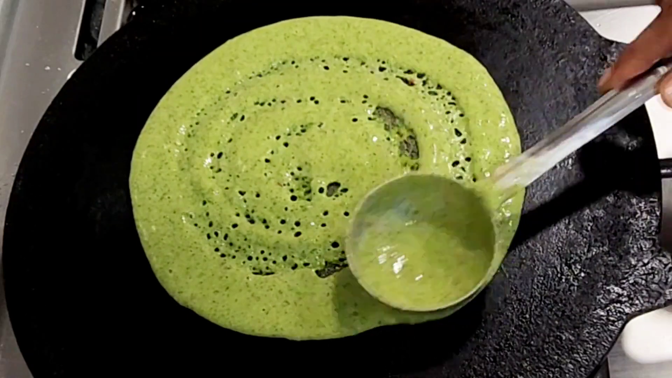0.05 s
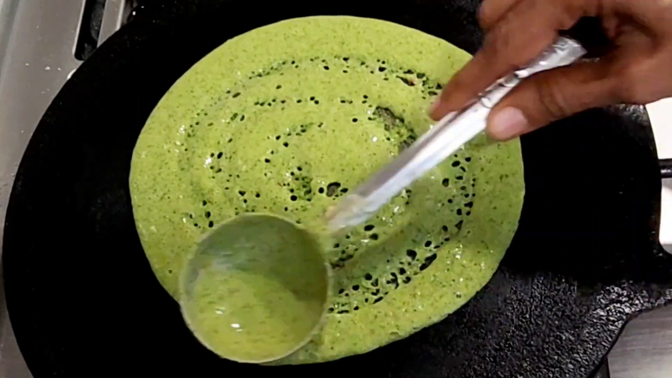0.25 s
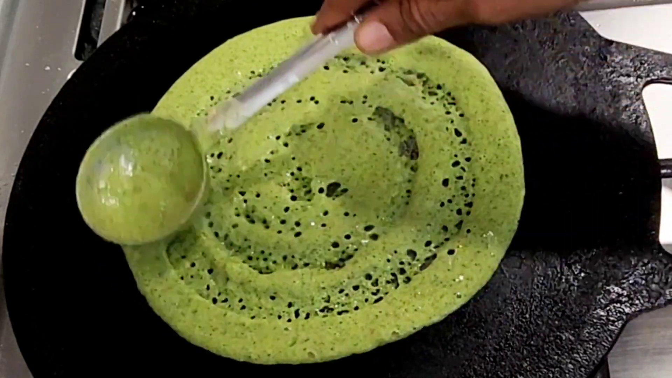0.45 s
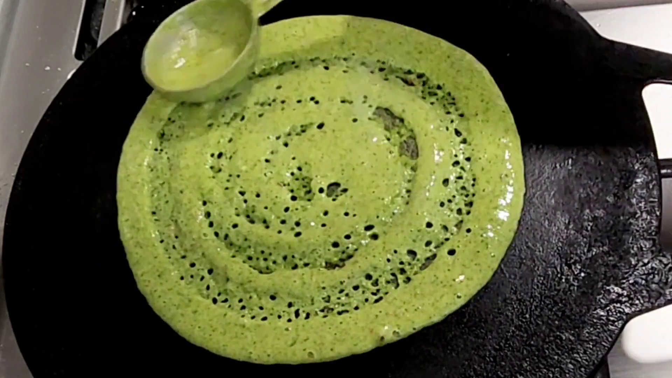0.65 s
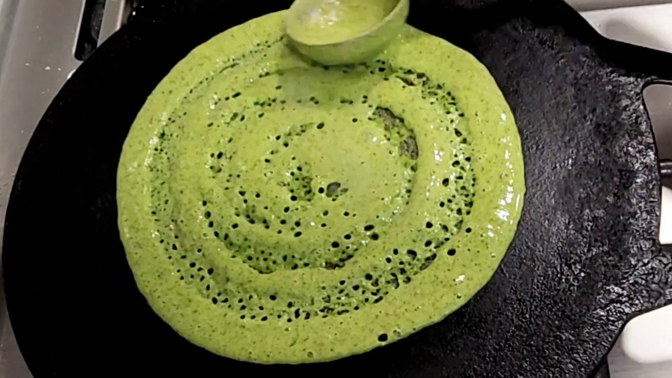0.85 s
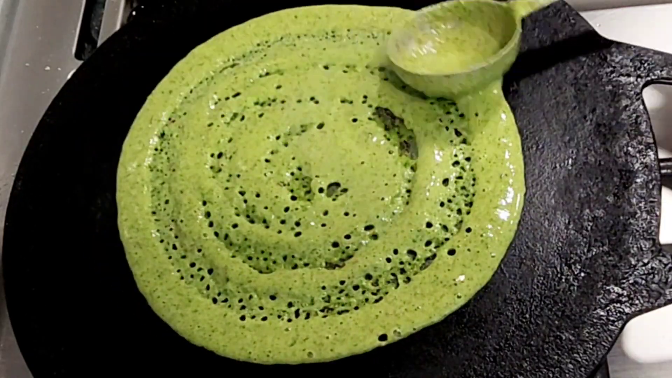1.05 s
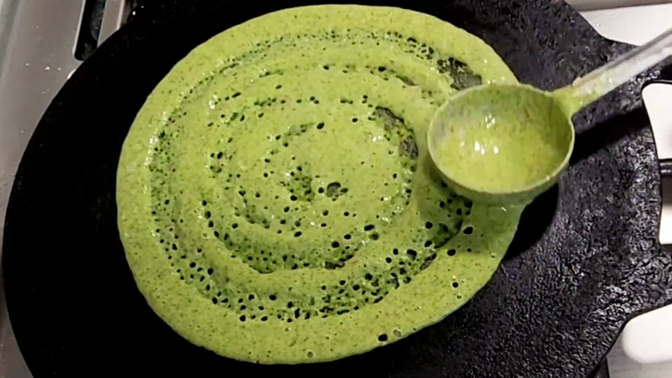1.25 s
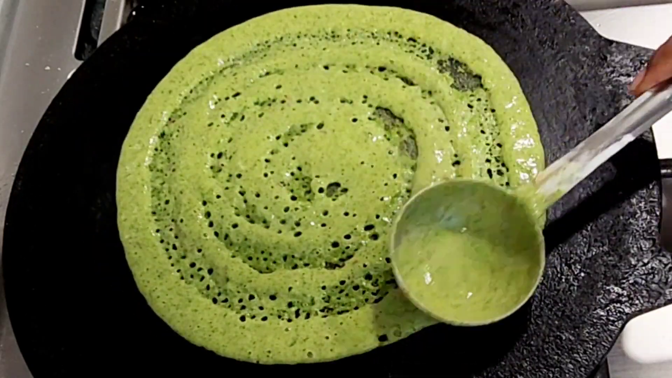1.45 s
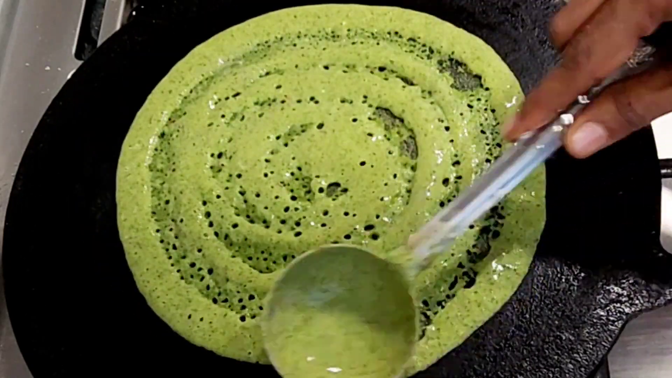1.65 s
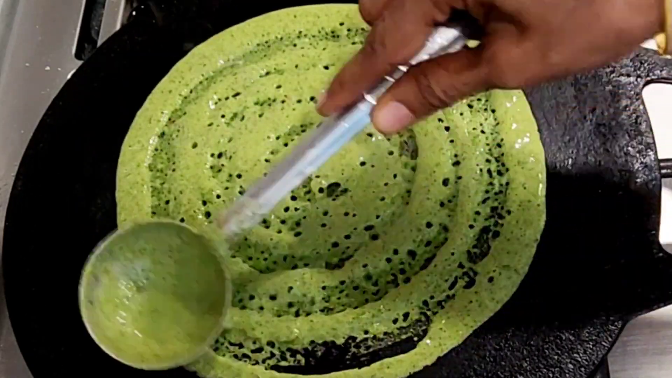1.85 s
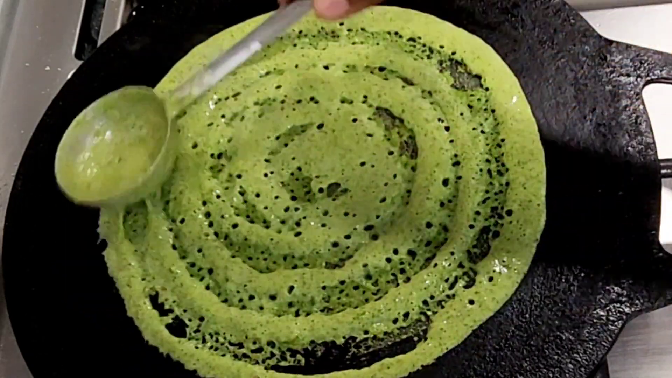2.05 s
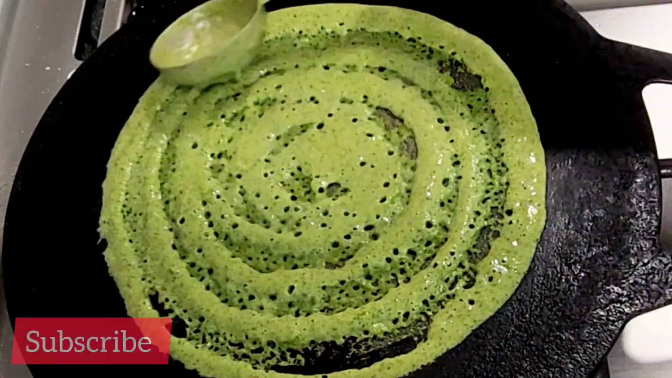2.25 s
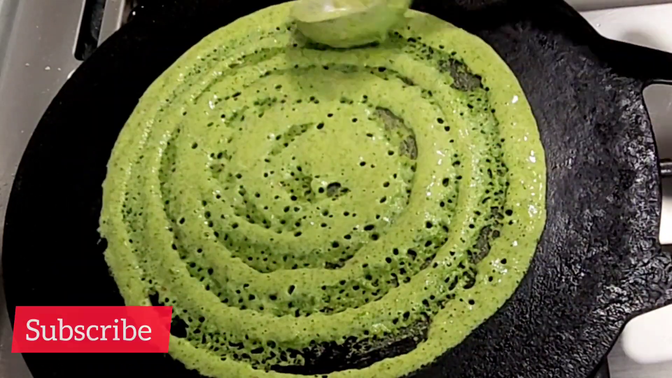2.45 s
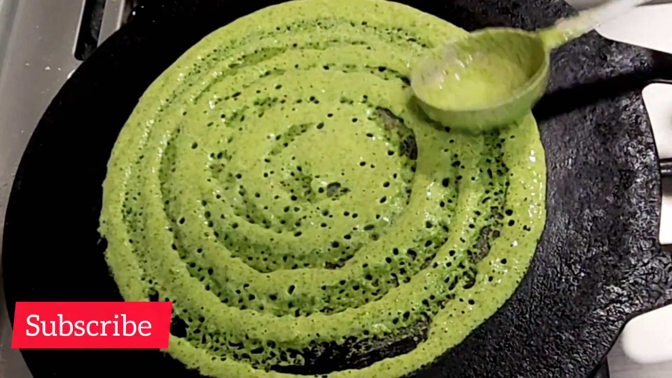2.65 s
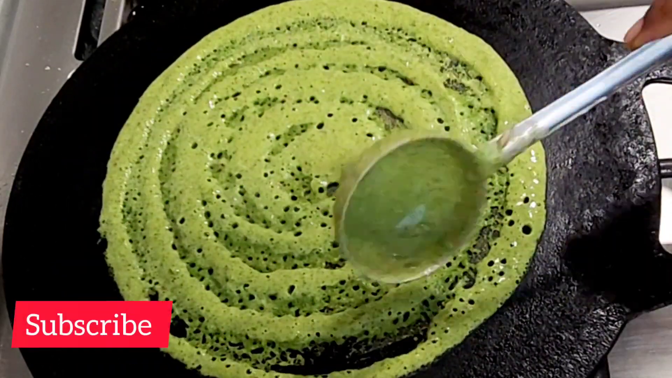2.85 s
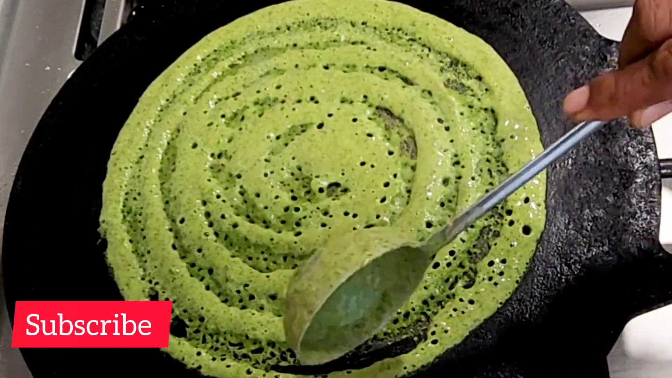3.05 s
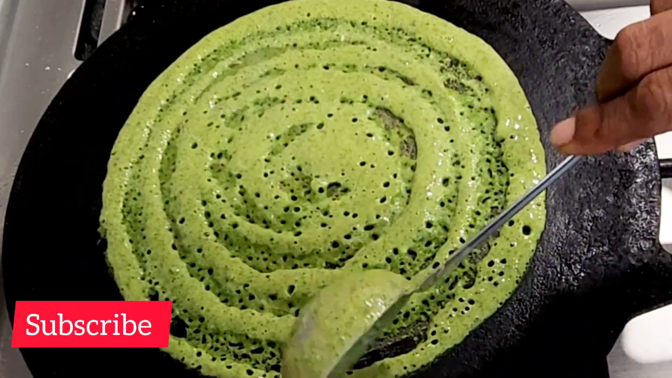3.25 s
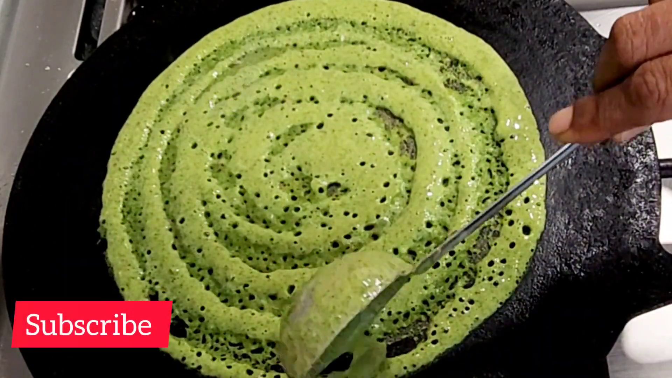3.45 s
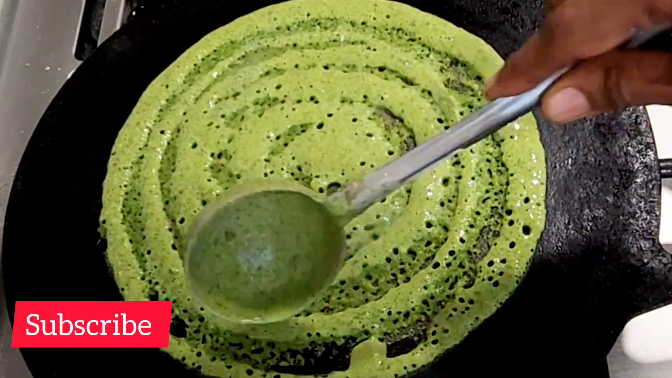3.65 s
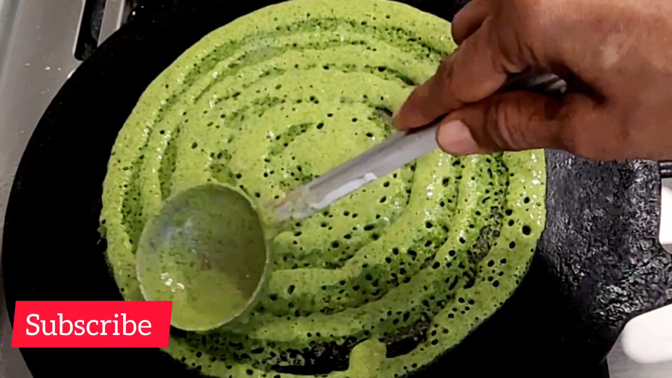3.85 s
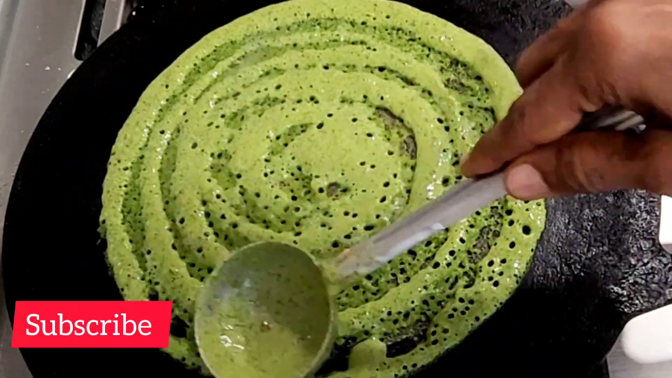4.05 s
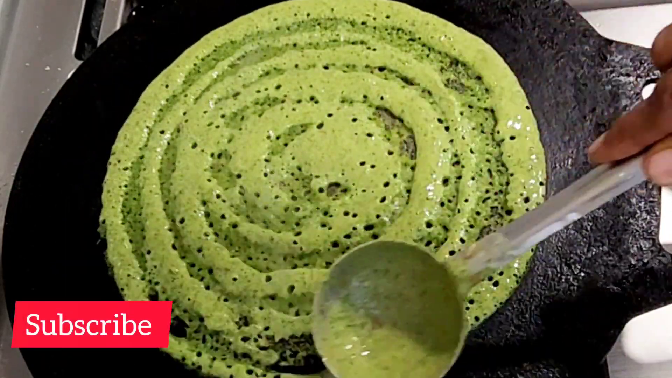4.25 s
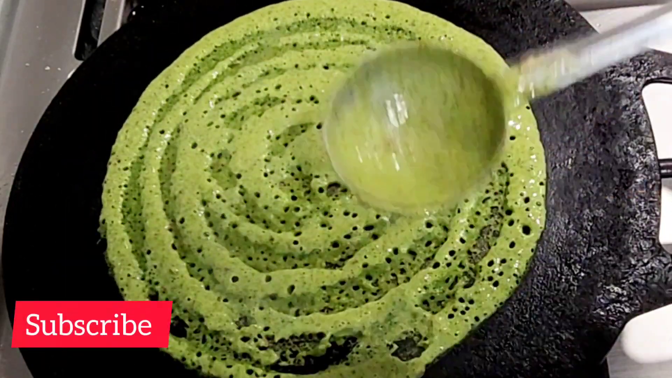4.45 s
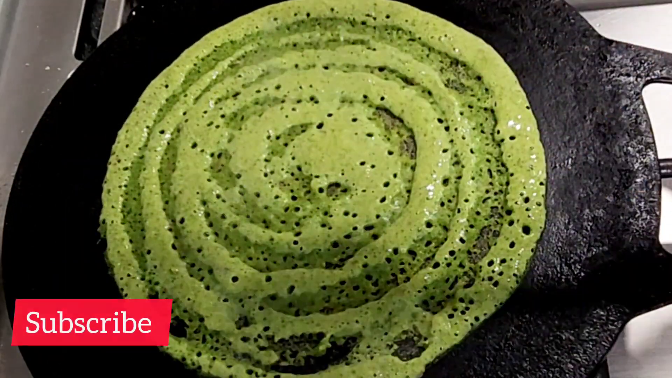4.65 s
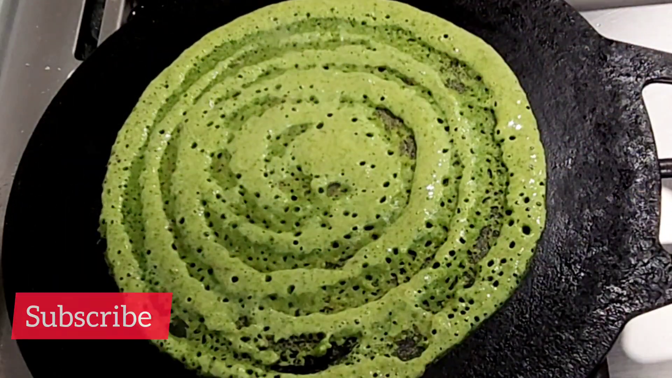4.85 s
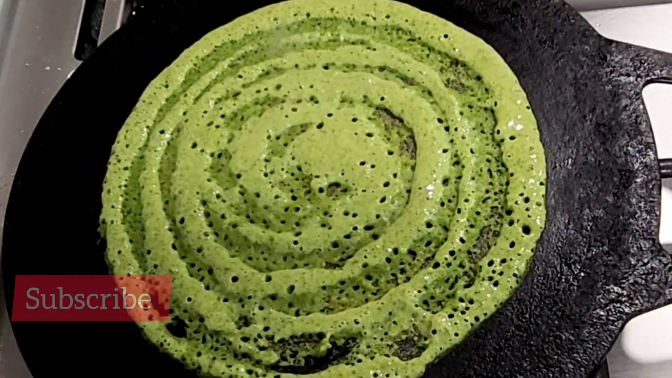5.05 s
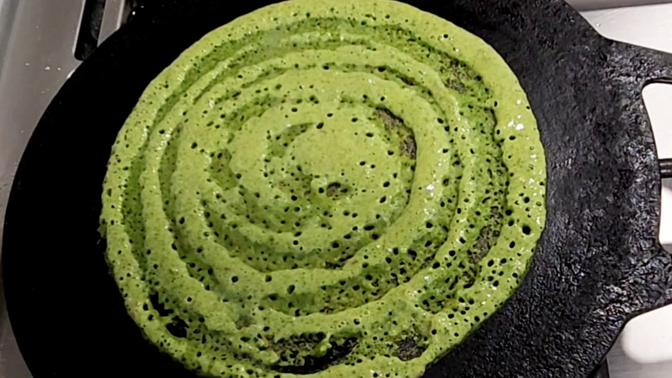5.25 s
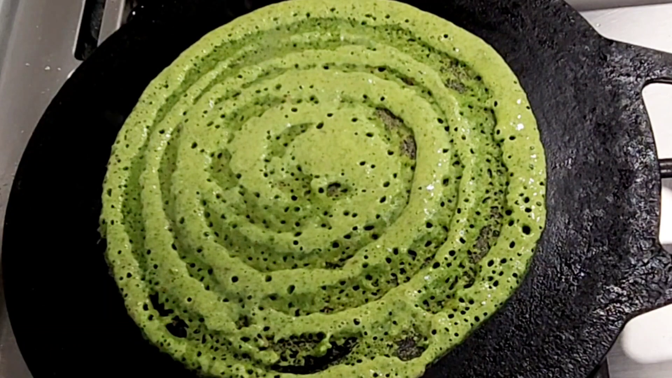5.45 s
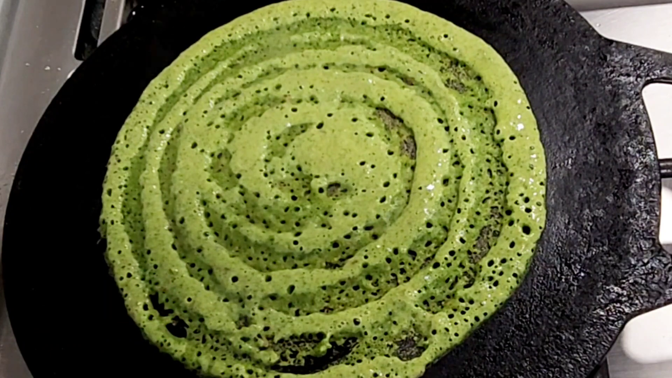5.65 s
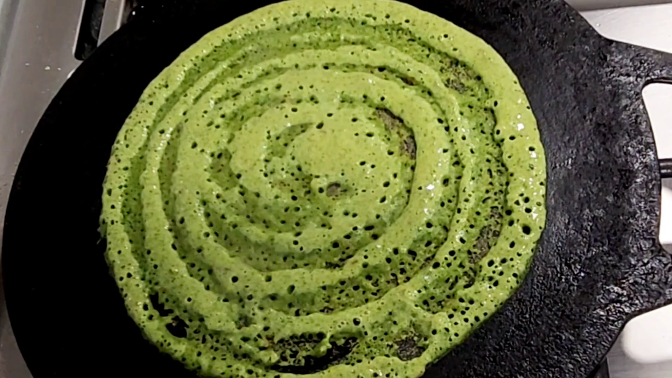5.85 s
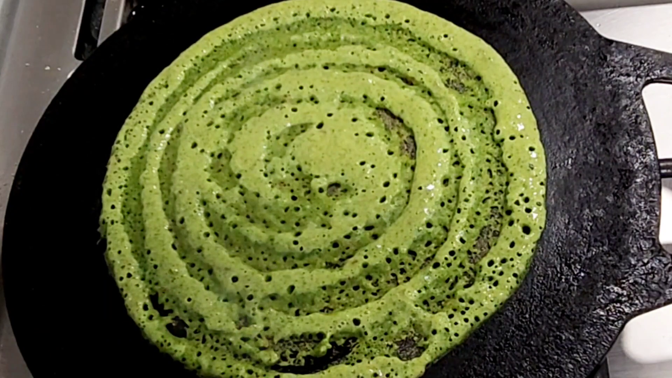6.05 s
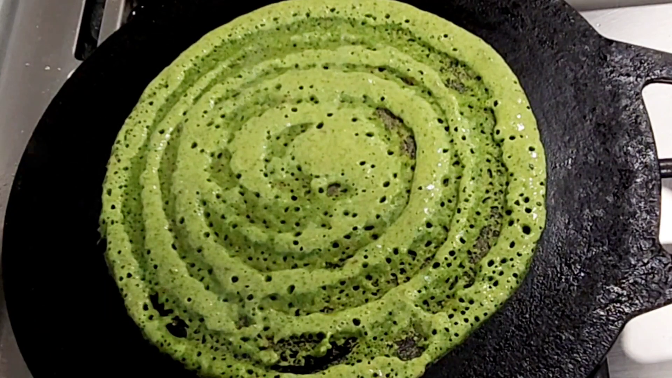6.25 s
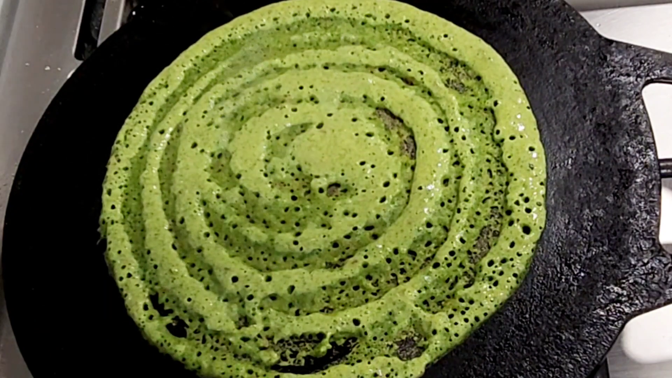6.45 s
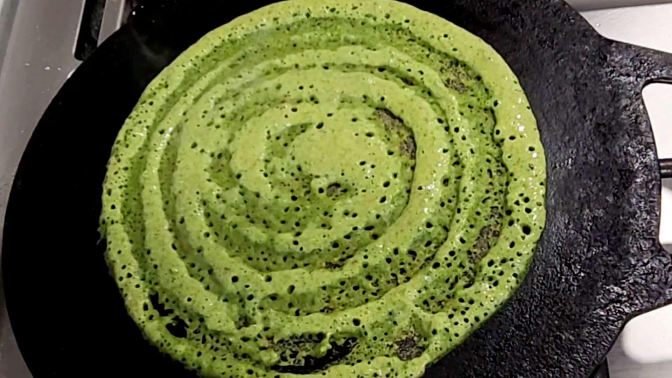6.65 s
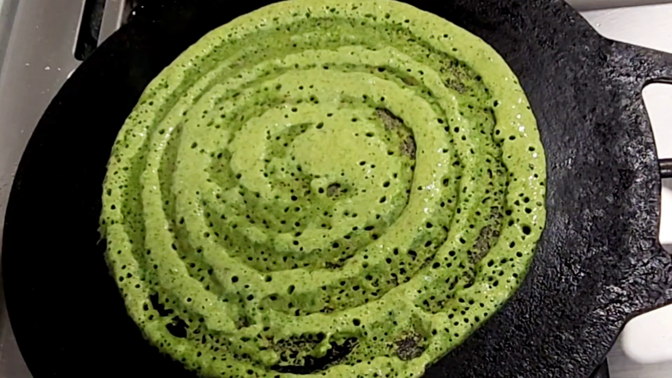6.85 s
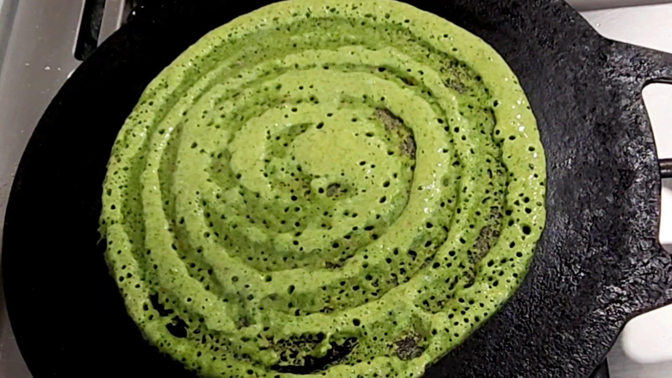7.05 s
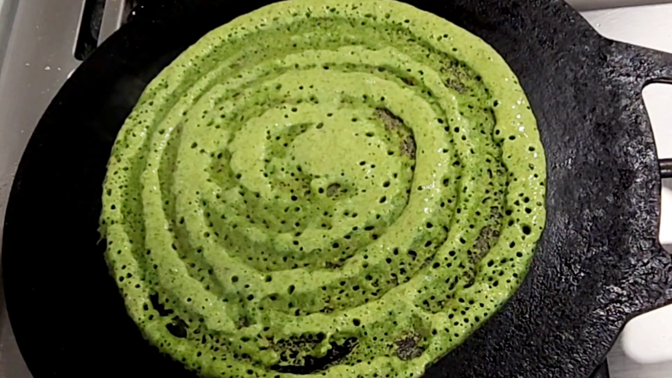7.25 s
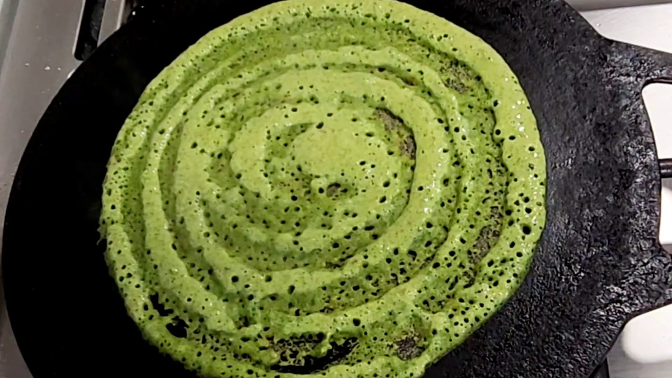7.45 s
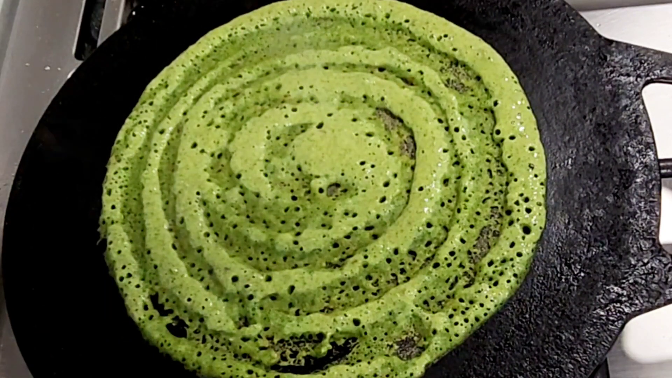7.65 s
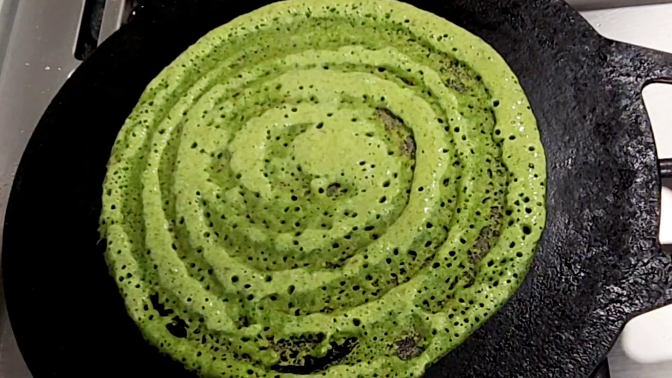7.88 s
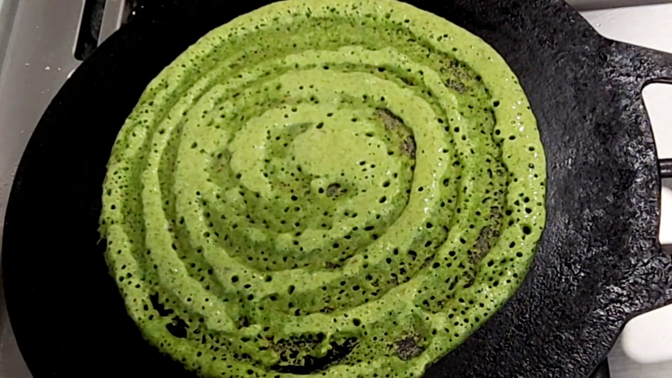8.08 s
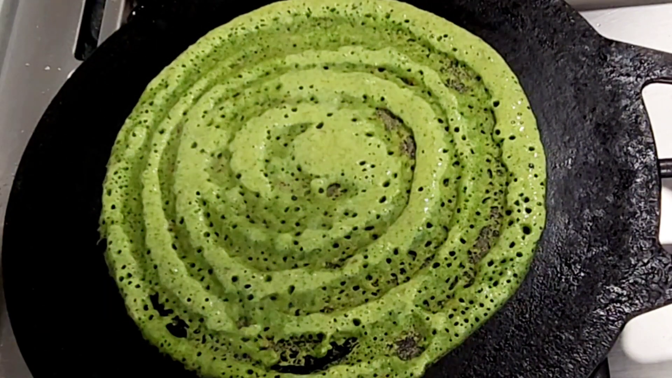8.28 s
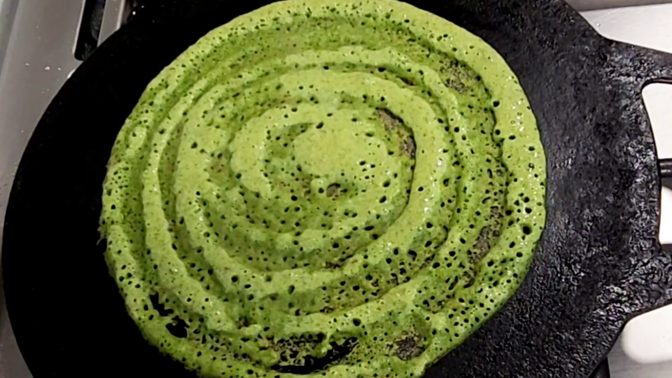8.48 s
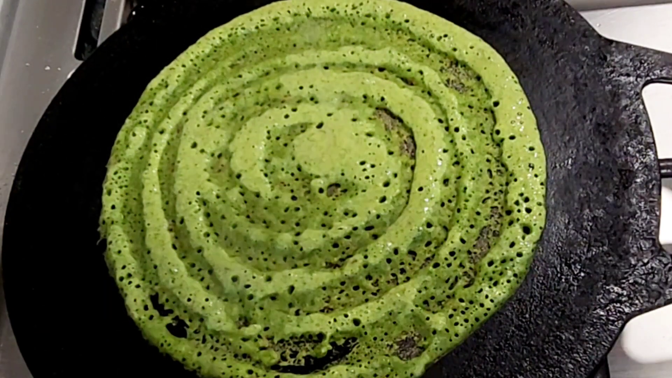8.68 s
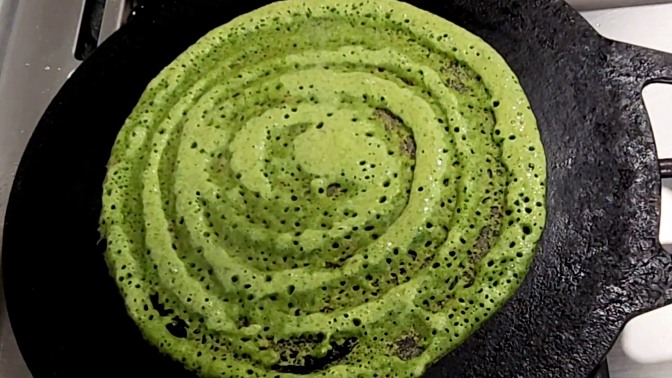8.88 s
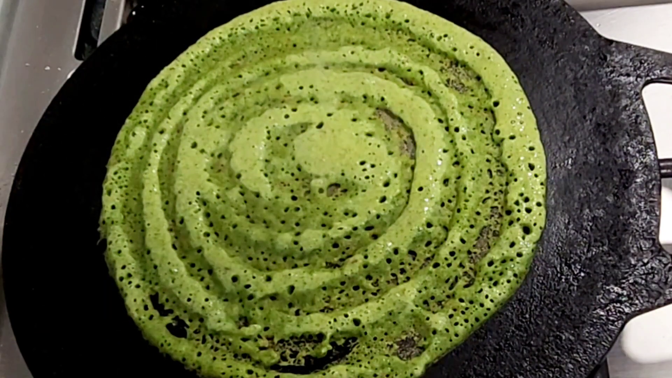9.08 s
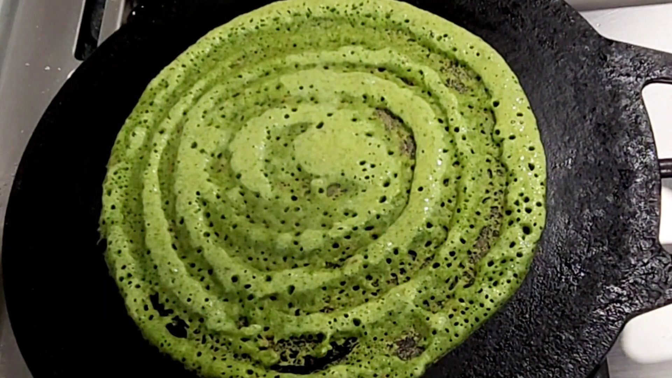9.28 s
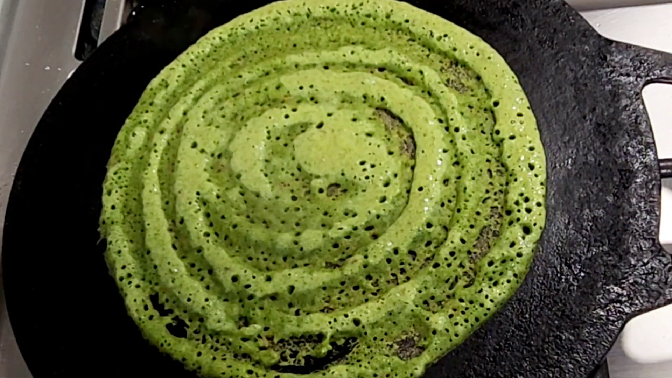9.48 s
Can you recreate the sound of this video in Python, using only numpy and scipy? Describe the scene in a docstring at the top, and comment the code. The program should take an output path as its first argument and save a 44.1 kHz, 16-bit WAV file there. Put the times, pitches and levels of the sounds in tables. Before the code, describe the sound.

Loud wet batter sizzle on hot iron swells twice and dries to sparse spitting, with a ladle knock, a metallic clink and low flame roar.

```python
"""Wet batter is spread with a steel ladle on a hot iron griddle: random bubble bursts make its sizzle.
Two sweeps swell the sizzle; it fades to flurries, and single bubbles spit as a snap and a sputter.
A gas flame roars low, as filtered noise and narrow resonances, in a small kitchen with short reverberation.
Contact forces ring vibration modes: the ladle knocks on the griddle, is put down with a clink and slides.
Two soft bumps follow as muffled noise thuds."""
import sys
import numpy as np
from scipy import signal
from scipy.fft import rfft, irfft
from scipy.io import wavfile
from scipy.ndimage import uniform_filter1d

SR = 44100
rng = np.random.default_rng(int(sys.argv[2]) if len(sys.argv) > 2 else 0)


def unload_audio(sound):
    """Save the sound as a 16-bit wav file, at the path given as the first command line argument."""
    columns = np.transpose(np.atleast_2d(sound))
    # keep every value between -1 and 1, then stretch to whole-number steps
    steps = np.round(np.clip(columns, -1, 1) * 32767)
    wavfile.write(sys.argv[1], SR, steps.astype(np.int16))


N = 419832


def from_db(db):
    """Decibels to amplitude gain."""
    return 10 ** (np.asarray(db) / 20)


def rms_one(x):
    """Scale to rms 1."""
    return x / np.sqrt(np.mean(x ** 2) + 1e-20)


def at_hz(points, hz):
    """Interpolate a table on a log-frequency axis."""
    table_hz, value = np.transpose(points)
    return np.interp(np.log(np.maximum(hz, 1)), np.log(table_hz), value)


def drift(rate_hz, step=40):
    """Slow random signal, rms 1: twice low-passed noise, one value per step samples."""
    pole = np.exp(-2 * np.pi * rate_hz * step / SR)
    noise = rng.standard_normal(N // step + 2002)
    slow = signal.lfilter([1], [1, -2 * pole, pole * pole], noise)[2000:]  # drop the run-in
    return np.interp(np.arange(N) / step, np.arange(len(slow)), rms_one(slow))


def through(x, response):
    """Convolve with a mono or stereo impulse response."""
    return signal.oaconvolve(np.atleast_2d(x), np.atleast_2d(response), axes=-1)[:, :N]


def colour(x, spectrum, size=8192):
    """Minimum-phase filter with the given spectrum, by folding its cepstrum."""
    gain = from_db(at_hz(spectrum, np.fft.rfftfreq(size, 1 / SR)))
    cepstrum = irfft(np.log(gain))
    cepstrum[1:size // 2] *= 2
    cepstrum[size // 2 + 1:] = 0
    return through(x, irfft(np.exp(rfft(cepstrum))))


def ring(force, hz, t60_s):
    """Two-pole resonator: a unit click starts a decaying sine of height 1."""
    pole = np.exp(-np.log(1000) / (t60_s * SR))
    angle = 2 * np.pi * min(hz, SR / 2 - 1) / SR
    feedback = [1, -2 * pole * np.cos(angle), pole * pole]
    return signal.lfilter([0, np.sin(angle)], feedback, force + 1e-18)


def puff(t60_s, size=2048):
    """Dying noise burst, whitened then faded; unit energy, independent at each ear."""
    fade = np.exp(-np.log(1000) * np.arange(size) / SR / t60_s)
    spectrum = rfft(rng.standard_normal((2, size)) * fade, 2 * size)
    burst = irfft(spectrum / np.abs(spectrum))[:, :size] * np.sqrt(fade)
    return burst / np.sqrt(np.sum(burst ** 2, axis=1, keepdims=True))


def bubble(hz, t60_s, tone=0.56, cycles=7):
    """A skin tears: a puff of steam briefly rings the bubble's cavity; unit energy."""
    steam_puff = puff(t60_s)
    cavity = ring(steam_puff, hz, cycles / hz)
    burst = rms_one(steam_puff) + tone * rms_one(cavity)
    return burst / np.sqrt(np.sum(burst ** 2) / 2)


def bursts(per_s, spread_db, largest, t60_s, low_hz, high_hz, count=12):
    """Bubbles of random size and pitch burst at random; the slow level is held near 1."""
    size_db = spread_db * np.minimum(rng.exponential(1, N), largest)
    sizes = from_db(size_db) * rng.choice([-1, 1], N)
    clicks = sizes * (rng.random(N) < per_s / SR)
    kind = rng.integers(0, count, N)
    out = np.zeros((2, N))
    for k, hz in enumerate(np.geomspace(low_hz, high_hz, count)):
        out += through(clicks * (kind == k), bubble(hz, t60_s))
    slow_power = uniform_filter1d(np.mean(out ** 2, axis=0), size=12000)
    return out / np.sqrt(slow_power + 1e-9)


# ladle spreads batter on fresh hot iron, which then dries; levels when fully wetted, before drying
# [start_s, end_s, fizz_db, wet_db, fade_db_per_s]
BATTER_SWEEPS = [(-0.1, 0.245, -23.2, -26, 5.5), (1.294, 2.145, -24.5, -34, 3)]


def steam():
    """Sizzle grows with the iron each sweep wets and fades as it dries: fizz_db, wet_db."""
    t, power = np.arange(N) / SR, 1e-12
    for start_s, end_s, fizz_db, wet_db, fade_db_per_s in BATTER_SWEEPS:
        wetted = np.clip((t - start_s) / (end_s - start_s), 0, 1)
        dried_db = fade_db_per_s * np.maximum(t - end_s, 0)
        power = power + wetted * from_db(np.array([[fizz_db], [wet_db]]) - dried_db) ** 2
    return 10 * np.log10(power)


# spectrum of fizz and crackle [freq_hz, relative_db]
FIZZ_SPECTRUM = [(300, -19.5), (900, -17), (1900, -6), (2600, -6.5), (3500, -1.5), (4400, -2), (5400, 1),
                 (6200, 0), (7400, 4), (8400, 1.5), (10000, -0.5), (12900, 4), (13800, 3.5), (15600, 5.5)]
# spectrum of wet boiling [freq_hz, relative_db]
BOILING_SPECTRUM = [(200, -10.5), (450, -9.5), (800, -5), (1100, -6), (1450, 2.5), (1730, -1.5), (2050, 1),
                    (2600, -2.5), (4500, 1.5), (7500, -3.5), (14000, -24)]
# mean crackle burst rate at full sizzle; power of the sizzle level it follows
FULL_SIZZLE_DB, CRACKLE_BURSTS_PER_S, RATE_POWER = -24.5, 1500, 0.96
# crackle over fizz: at full sizzle, rise per dB of sizzle fall, upper limit once set
CRACKLE_WET_DB, CRACKLE_DB_PER_DB, CRACKLE_SET_DB = -8, 1.1, -1.0


def batter(fizz_db, wet_db):
    """Fine fizz and sparser crackle at the hot iron; wet batter adds a lower boiling."""
    fallen_db = FULL_SIZZLE_DB - fizz_db
    per_s = CRACKLE_BURSTS_PER_S * from_db(-RATE_POWER * fallen_db)
    crackle_db = np.minimum(CRACKLE_WET_DB + CRACKLE_DB_PER_DB * fallen_db, CRACKLE_SET_DB)
    # the burst rate drifts; fewer bubbles, wider swings
    swing_db = 3.6 * (300 / per_s) ** 0.3
    clumped_per_s = per_s * from_db(swing_db * drift(28))
    fizz = bursts(12 * clumped_per_s, spread_db=4.5, largest=3.9, t60_s=0.0073,
                  low_hz=2000, high_hz=13000)
    crackle = bursts(clumped_per_s, spread_db=5.5, largest=4.27, t60_s=0.013,
                     low_hz=3450, high_hz=15500)
    share = from_db(crackle_db)
    mix = (fizz + share * crackle) / np.sqrt(1 + share ** 2)
    frying = np.hypot(from_db(fizz_db), flurries()) * colour(mix, FIZZ_SPECTRUM)
    boil = bursts(8 * clumped_per_s, spread_db=3.0, largest=3.6, t60_s=0.0095,
                  low_hz=900, high_hz=4980)
    return frying + from_db(wet_db) * rms_one(colour(boil, BOILING_SPECTRUM))


# kitchen reverberation [freq_hz, t60_s]
KITCHEN_DECAY = [(150, 0.4), (700, 0.35), (3000, 0.37), (12000, 0.14)]


def kitchen(x, size=16384):
    """Diffuse reflections from near walls and tiles: band noise, the top treble dying first."""
    t, out = np.arange(size) / SR, 0
    edges_hz = np.geomspace(60, 17000, 9)
    for low_hz, high_hz in zip(edges_hz, edges_hz[1:]):
        band_pass = signal.butter(2, [low_hz, high_hz], "band", fs=SR, output="sos")
        band = signal.sosfilt(band_pass, rng.standard_normal((2, size)))
        t60_s = at_hz(KITCHEN_DECAY, np.sqrt(low_hz * high_hz))
        out = out + band * np.exp(-np.log(1000) * t / t60_s)
    out = out * np.clip(t / 0.0014 - 0.5, 0, 1)  # silent for 0.7 ms
    return through(x, out / np.sqrt(np.sum(out ** 2) / 2))


# roar spectrum [freq_hz, relative_db]
FLAME_SPECTRUM = [(12, -25), (25, -3.5), (50, -1), (110, 4), (150, -6), (198, -15.5), (245, -7.5),
                  (300, -17.5), (440, -25), (600, -16), (800, -15.5), (920, -26), (1100, -45),
                  (3000, -38.5)]
# hollow under the griddle, sung by the flame; levels relative to HOLLOW_DB [freq_hz, width_hz, level_db]
HOLLOW_MODES = [(56.6, 7.6, -53), (115, 19, -54), (162.6, 4.7, -57), (237, 9.3, -55.5), (577, 40, -65),
                (785, 67, -57.5), (1470, 44, -68), (1850, 32, -65.5)]
ROAR_DB, HOLLOW_DB = -37.5, 1.5


def flame():
    """Burner noise makes a low roar and excites the hollow's narrow resonances."""
    air = rng.standard_normal((2, N))
    roar = from_db(ROAR_DB) * rms_one(colour(air, FLAME_SPECTRUM))
    for hz, width_hz, level_db in HOLLOW_MODES:
        peak = signal.iirpeak(hz, hz / width_hz, fs=SR)
        roar = roar + from_db(level_db + HOLLOW_DB) * rms_one(signal.lfilter(*peak, air))
    return roar


# spits at set times, nominal peaks [start_s, peak_db, pitch_hz]
TIMED_SPITS = [(0.4229, -9, 4630), (0.8081, -9, 7290), (0.9547, -13, 5680), (1.0306, -10, 7590),
               (1.3259, -12, 8100), (1.4092, -10, 7330), (2.8858, -12, 13000), (3.9325, -16, 12800),
               (4.0058, -14, 7110), (4.2552, -15, 12800), (4.8284, -20, 12600), (4.9028, -14, 15400),
               (5.0848, -17, 7150), (5.3986, -11, 12400), (5.4345, -19, 14600), (5.6496, -17, 4130),
               (5.9494, -16, 14700), (5.9853, -17, 14700), (6.1908, -15, 13100), (6.4068, -13, 14800),
               (6.545, -19, 7260), (7.7653, -19, 15100), (7.8246, -16, 8040), (8.2831, -22, 7640),
               (8.4063, -25, 3370), (9.2633, -29, 1990), (9.3182, -22, 11300)]
# snap: nominal peak over rms; sputter: amplitude share, decay
SPIT_CREST_DB, SPIT_SPUTTER, SPUTTER_T60_S = 5.5, 0.45, 0.035


def spits(rows, size=2048, snap_size=66):
    """Single bubbles burst: a sharp snap and a short sputter of steam."""
    out = np.zeros((2, N + size))
    for start_s, peak_db, hz in rows:
        burst = bubble(hz, t60_s=0.0065, tone=0.45) + SPIT_SPUTTER * puff(SPUTTER_T60_S)
        # a small opening radiates little below its own pitch
        burst = signal.lfilter(*signal.butter(1, hz / 2, "high", fs=SR), burst)
        at = round(start_s * SR)
        snap_rms = burst[:, :snap_size].std()
        out[:, at:at + size] += from_db(peak_db - SPIT_CREST_DB) * burst / snap_rms
    return out[:, :N]


# nominal peak at full sizzle; dB of fall per dB of sizzle fall
RANDOM_SPIT_DB, RANDOM_FOLLOWS = -8.5, 1


def random_spits(fizz_db, count=16, low_hz=5000, high_hz=15000):
    """Spits at random times, level following the sizzle: rows of start_s, peak_db, pitch_hz."""
    when, pitch = rng.random((count, 2)).T
    at = (when * N).astype(int)
    peak_db = RANDOM_SPIT_DB + RANDOM_FOLLOWS * (fizz_db[at] - FULL_SIZZLE_DB)
    return zip(at / SR, peak_db, low_hz + pitch * (high_hz - low_hz))


def contacts(rows, size=256):
    """Force of a series of touches; the softer the touch, the longer its push."""
    force, t = np.zeros(N), np.arange(1, size + 1) / SR
    for start_s, level_db, hardness_hz in rows:
        push = t * np.exp(-2 * np.pi * hardness_hz * t)
        at = round(start_s * SR)
        force[at:at + size] += from_db(level_db) * push / push.sum()
    return force


def struck(force, modes, crack, ring_db, crack_db, crack_t60_s):
    """A force rings a body's modes, and cracks in its many short-lived ones."""
    out = np.zeros((2, N))
    for hz, level_db, t60_s in modes:
        tone = from_db(level_db + ring_db) * ring(force, hz, t60_s)
        out += [np.roll(tone, lag) for lag in rng.integers(0, 3, 2)]  # 0-2 samples late per ear
    cracked = colour(through(force, puff(crack_t60_s, size=4096)), crack)
    return out + from_db(crack_db) * cracked


# ladle on griddle, relative force [start_s, level_db, hardness_hz]
KNOCK_CONTACTS = [(3.4697, 0.5, 1110), (3.4715, -5.5, 2500), (3.4755, -6.5, 7100), (3.4775, -4, 6960),
                  (3.484, -5.5, 2000), (3.489, -13, 1500), (3.517, -10, 796), (3.545, -23, 700)]
# griddle and iron stand, relative levels [freq_hz, level_db, t60_s]
GRIDDLE_MODES = [(86.4, -22.5, 0.82), (119, -15.5, 0.17), (170, -34, 0.35), (236, -31, 0.31),
                 (291, -24, 0.3), (342, -30, 0.16), (494, -18, .04), (466, -42, 0.22), (577, -34, 0.23),
                 (583, -31, 0.61), (660, -29, 0.15), (693, -18, 0.023), (700, -39, 0.3), (780, -34, 0.16),
                 (830, -33, .18), (916, -34, 0.2), (1390, -35, .2), (1630, -32, .08), (1834, -24, 0.11),
                 (2230, -24, .13), (2740, -10, 0.12)]
# griddle's short-lived modes [freq_hz, relative_db]
KNOCK_SPECTRUM = [(100, -1.5), (300, 9.5), (420, 0), (650, 8), (820, 8.5), (1020, -5), (1900, -2.5),
                  (2700, -5.5), (5000, -1.5), (8000, -1.5), (15000, -7.5)]
# ladle put down, relative force [start_s, level_db, hardness_hz]
CLINK_CONTACTS = [(5.6938, 3, 12000), (5.698, 3, 9000), (5.712, 3, 7000)]
# steel ladle and bowl, relative levels [freq_hz, level_db, t60_s]
LADLE_MODES = [(536, -36, 0.16), (826, -31, .12), (889, -37, 0.085), (1490, -35, 0.092), (2975, -24, 0.045),
               (3038, -25, .06), (4110, -27, .06), (4175, -25, .08), (4240, -27, .06), (5085, -29, 0.05),
               (6441, -19.5, 0.057), (6700, -24, .07), (6600, -23, .08), (8100, -30, .06),
               (9300, -27, 0.049), (12500, -30, .03)]
# ladle's short-lived modes [freq_hz, relative_db]
CLINK_SPECTRUM = [(200, -18), (330, -20), (520, -3), (700, -4), (850, 3), (1200, -8), (2200, -10),
                  (3000, 0), (3500, -8), (4200, 2), (5900, -5), (6600, 2), (9300, -2), (15000, -7)]
# counter under the ladle, relative levels [freq_hz, level_db, t60_s]
COUNTER_MODES = [(62.4, -29.5, 0.55), (88, -25, 0.22)]
# ladle slides to rest, rubbing force [time_s, grip_db]
SLIDE_GRIP = [(5.69, -120), (5.70, -48), (5.745, -32.5), (5.775, -46), (5.797, -48), (5.81, -120)]
RUB_LOW_HZ = 3500


def ladle():
    """Impacts ring griddle, ladle and counter; treble rubbing noise rings the sliding ladle."""
    knock = struck(contacts(KNOCK_CONTACTS), GRIDDLE_MODES, KNOCK_SPECTRUM,
                   ring_db=-2.5, crack_db=28.5, crack_t60_s=0.037)
    time_s, grip_db = np.transpose(SLIDE_GRIP)
    grip = from_db(np.interp(np.arange(N) / SR, time_s, grip_db))
    high_pass = signal.butter(1, RUB_LOW_HZ, "high", fs=SR)
    rubbing = grip * signal.lfilter(*high_pass, rng.standard_normal(N))
    clink = struck(contacts(CLINK_CONTACTS) + rubbing, LADLE_MODES, CLINK_SPECTRUM,
                   ring_db=-0.5, crack_db=13.5, crack_t60_s=0.03)
    first_touch = contacts(CLINK_CONTACTS[:1])
    boom = sum(from_db(level_db) * ring(first_touch, hz, t60_s)
               for hz, level_db, t60_s in COUNTER_MODES)
    return knock + clink + boom


# soft touches on the stove, relative force [start_s, level_db, hardness_hz]
BUMP_CONTACTS = [(6.488, -25, 382), (6.526, -17.5, 380)]


def bumps():
    """Something soft touches the stove: long pushes excite a muffled, short noise thud."""
    thud = through(contacts(BUMP_CONTACTS), puff(t60_s=0.14, size=4096))
    return from_db(27.0) * colour(thud, KNOCK_SPECTRUM)


# steam escapes from under the setting batter [centre_s, length_s, level_db]
STEAM_FLURRIES = [(6.73, 0.4, -38.5), (7.52, 0.24, -36.5), (7.79, 0.12, -42), (8.017, 0.12, -36.5),
                  (8.262, 0.14, -37), (9.0, 0.15, -43), (9.357, 0.12, -40)]


def flurries():
    """Gain of trapped steam escaping: each flurry swells and dies in a cosine hump."""
    t, gain = np.arange(N) / SR, np.zeros(N)
    for centre_s, length_s, level_db in STEAM_FLURRIES:
        phase = np.clip((t - centre_s) / length_s, -0.5, 0.5)
        gain += from_db(level_db) * np.cos(np.pi * phase)
    return gain


def scene():
    """Griddle and ladle sound in the kitchen, over the flame."""
    fizz_db, wet_db = steam()
    sizzle = batter(fizz_db, wet_db) + spits(TIMED_SPITS) + spits(random_spits(fizz_db))
    blows = ladle() + bumps()
    reverberation = kitchen(from_db(-14.0) * sizzle + from_db(-9.0) * blows)
    return sizzle + blows + reverberation + flame()


# microphone pair's width [freq_hz, side_db]
PAIR_WIDTH = [(60, -24), (130, -29.5), (290, -10.5), (640, -6), (1400, -1.5), (3000, 0.5)]
# right microphone, shaded from the pan [freq_hz, gain_db]
RIGHT_SHADING = [(100, -1), (400, -3), (650, -3.5), (1100, -2), (1450, -4.5), (2100, -2.5), (4400, -2),
                 (7400, -4.5), (9800, -0.5), (13000, -4.5), (15500, -11)]
CUTOFF_HZ = 15900


def record(dry):
    """Two close microphones share the bass, the right one shaded; peaks rounded, top cut."""
    mid = (dry[0] + dry[1]) / 2
    side = colour((dry[0] - dry[1]) / 2, PAIR_WIDTH)
    heard = np.vstack([mid + side, colour(mid - side, RIGHT_SHADING)])
    top_cut = signal.ellip(12, 0.1, 80, CUTOFF_HZ, fs=SR, output="sos")
    return signal.sosfilt(top_cut, 1.113 * np.tanh(heard / 1.107))


dry = scene()
out = record(dry)
unload_audio(out)
```